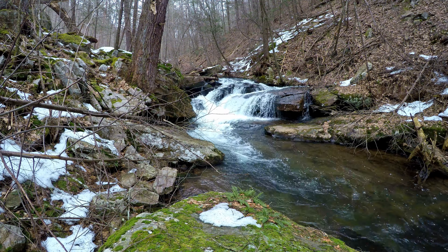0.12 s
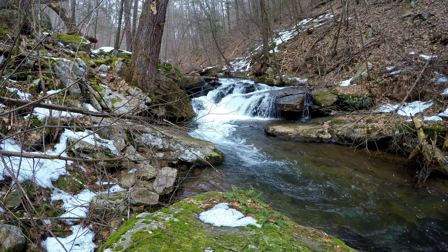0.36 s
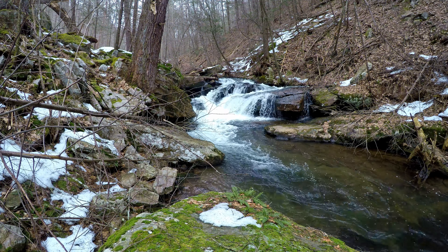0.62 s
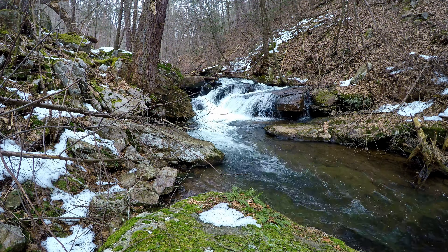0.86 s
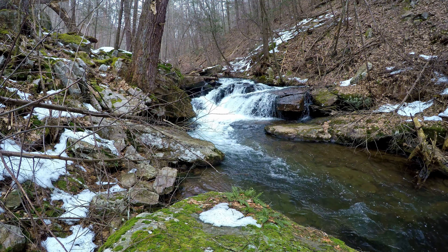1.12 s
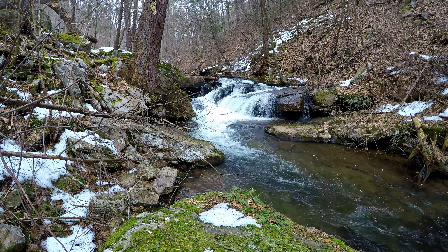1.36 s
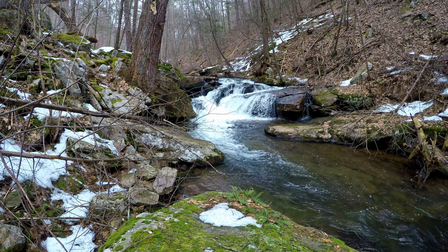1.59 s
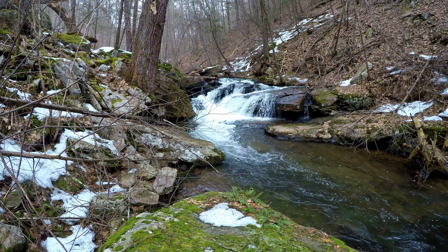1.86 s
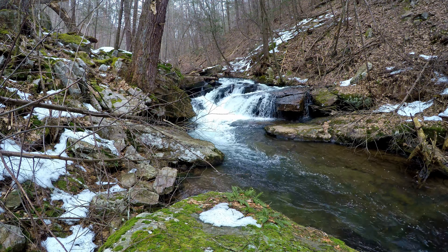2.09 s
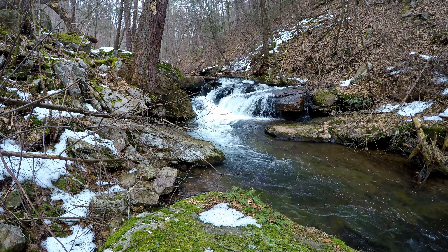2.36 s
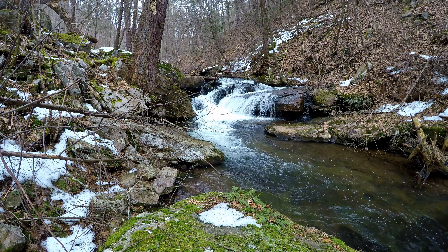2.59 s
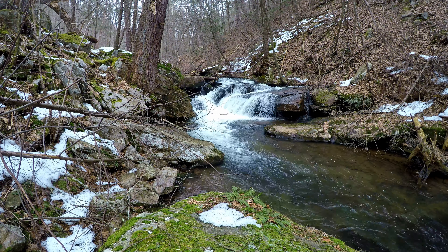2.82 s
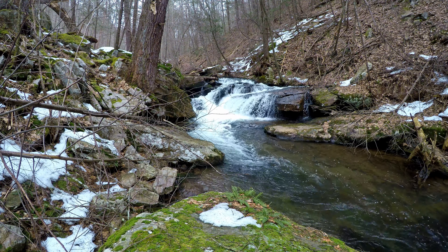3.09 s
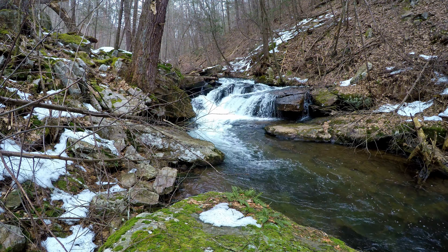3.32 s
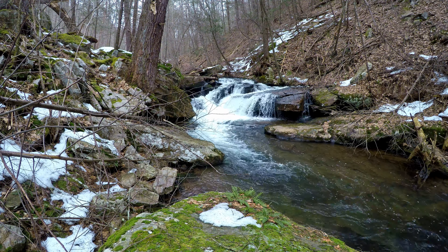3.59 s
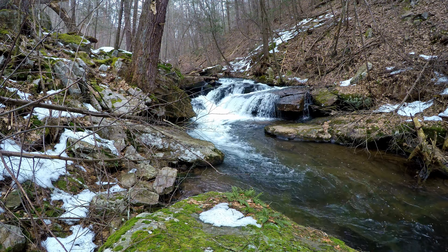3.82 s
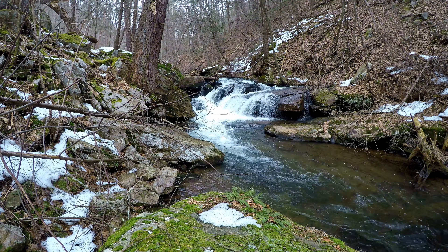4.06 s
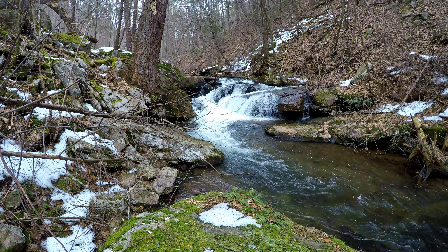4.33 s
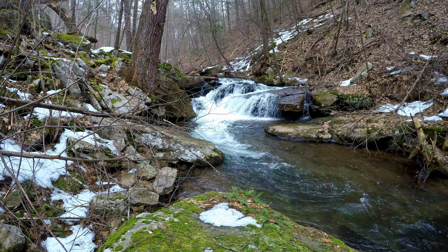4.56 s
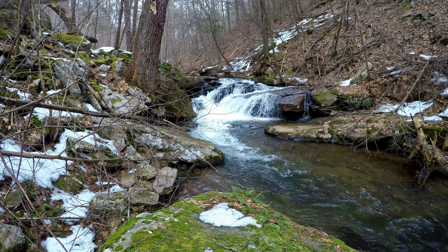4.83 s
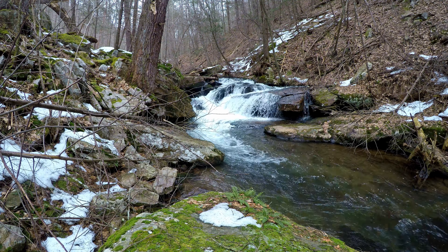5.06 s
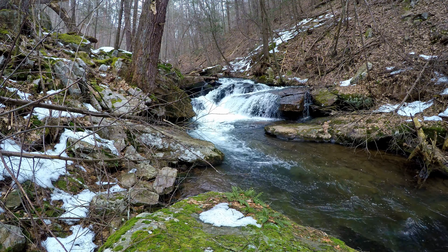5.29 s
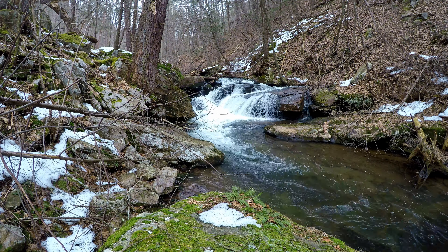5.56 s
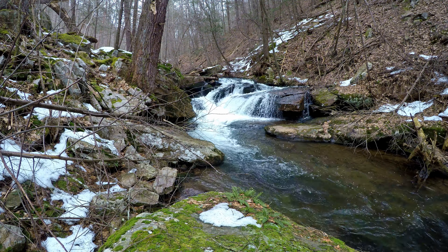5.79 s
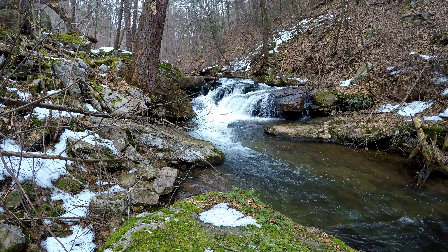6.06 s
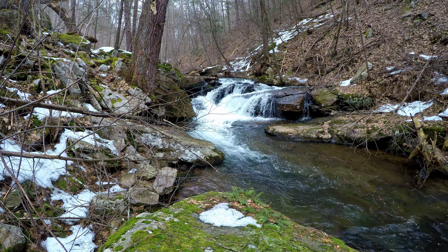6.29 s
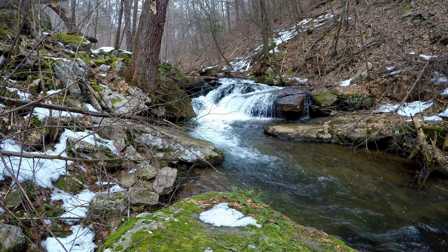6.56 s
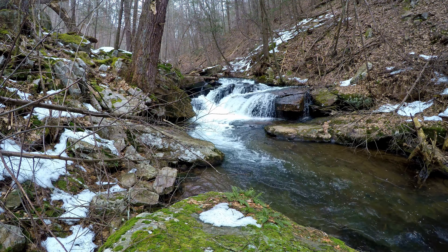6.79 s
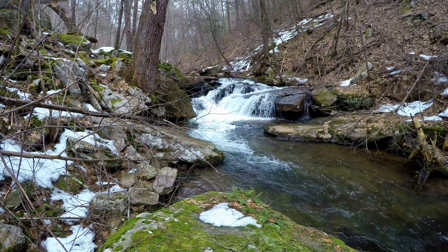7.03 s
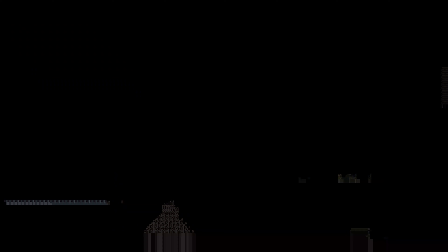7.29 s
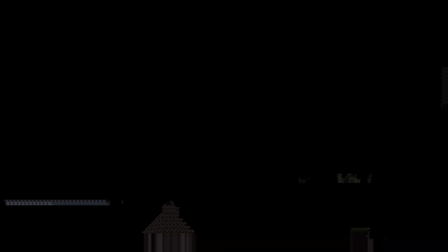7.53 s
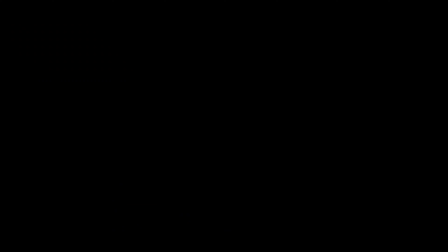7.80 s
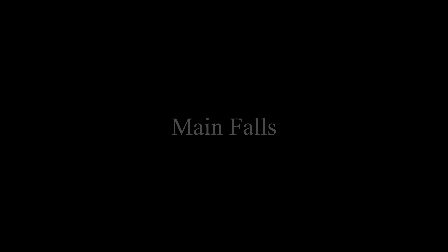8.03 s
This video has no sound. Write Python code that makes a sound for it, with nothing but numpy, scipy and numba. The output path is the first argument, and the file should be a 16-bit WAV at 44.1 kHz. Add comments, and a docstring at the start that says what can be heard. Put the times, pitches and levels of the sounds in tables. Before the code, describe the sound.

A small stream cascade pours over rocks into a pool in bare winter woods, heard from some metres away in stereo. A full, low plunging roar dominates, with a softer bubbly hiss of spray above. Two faint low wind puffs buffet the microphones during the first second. The flow then stays almost perfectly steady until about seven seconds, when it fades rapidly to complete silence.

```python
"""Small woodland cascade

A small woodland cascade pours over rocks into a pool, heard some metres off at two microphone ports.
The plunge drives clouds of air under water that roar in the bass; small bubbles and spray hiss above.
Both are bubble rings mixed with smooth noise and shaped in spectrum. At first a breeze, low noise in
two puffs, buffets the ports. Near the end the sound fades to silence, and silence is held."""
import sys
import numpy as np
from scipy import signal
from scipy.fft import rfft, irfft
from scipy.io import wavfile
from scipy.ndimage import uniform_filter1d, minimum_filter1d
from numba import njit

SR = 44100
rng = np.random.default_rng(int(sys.argv[2]) if len(sys.argv) > 2 else 0)


def pcm_store(signal):
    """Save signal as 16-bit PCM."""
    levels = np.round(np.clip(np.atleast_2d(signal), -1, 1) * 32767)
    wavfile.write(sys.argv[1], SR, levels.astype(np.int16).T)


def gain_from_db(level_db):
    """Convert decibel levels to linear amplitude factors (20 dB per decade)."""
    decades = np.asarray(level_db, float) / 20
    return 10 ** decades


N = 359415

# Spectral shape of the plunge's bass, mean of both ports: f/Hz, relative level/dB
ROAR_SPECTRUM = [(12, -43), (20, -16.5), (36, -6), (49, 0.5), (81, -1.5), (112, -0.5), (147, -4),
                 (243, -1.5), (300, -4), (345, -5.5), (410, -9), (568, -11.5), (631, -24), (700, -27),
                 (910, -41.5), (1540, -120)]
# Spectral shape of the white water's hiss, mean of both ports: f/Hz, relative level/dB
SPRAY_SPECTRUM = [(350, -31.5), (600, -3.5), (677, -4), (911, -4), (1090, -1), (1540, -3), (2100, -7.5),
                  (2600, -6), (3320, -4.5), (5040, -9.5), (5920, -5), (7340, -14.5), (8290, -25),
                  (9610, -28.5), (11000, -39.5), (12800, -33), (14400, -46), (15100, -46)]
# How the two ports differ: f/Hz, likeness (-1 to 1), left minus right/dB, left leads by/rad
PORTS = [(50, 1, 2.5, -.05), (120, 1, 1.5, -0.2), (300, 0.98, -.3, -.18), (520, 0.97, -1.5, -0.27),
         (700, 0.49, -3, -.28), (952, .54, -2.5, -0.29), (1200, 0.73, -4, -.12), (1600, 0.77, -2.5, .7),
         (2000, .69, 1, .41), (2400, 0.6, 0, -.08), (2820, 0.86, -2.1, -.25), (3420, 0.9, -1.5, -.04),
         (4300, 0.98, 0.5, 0.1), (5060, 0.57, 2.1, -.55), (5830, .77, 0, -.41), (6700, .52, 1.5, .08),
         (7500, .22, 3.2, .3), (8500, -0.53, -7, 0), (9800, -.25, -7.5, .1), (11030, .08, -4.5, .1),
         (12630, .6, 2, 0), (14500, -0.069, -4.5, 0)]
# Spectral shape of wind eddies at the ports: f/Hz, relative level/dB
BUFFET_SPECTRUM = [(12, -39), (20, -10), (81, 3.5), (255, -19), (500, -42), (1100, -100)]
# Puffs of wind before their flapping: start t/s, length t/s, level/dB
GUSTS = [(0.012, .09, -22), (0.206, .55, -24)]

BIN_HZ = np.maximum(np.arange(N // 2 + 1) * SR / N, 1.0)  # floored for the log axis
ROAR_DB, SPRAY_DB = -15, -21  # steady flow
SWELL_DB, SWELLS_PER_S = 0.1, 4.0  # rms and rate of the slow random heave
GUST_RISE_S, GUST_FALL_S = 0.02, 0.03  # straight rise, exponential fall
FLAP_DB = 2.2  # rms of the random flapping in each puff
FADE_START_S, FADE_END_S = 7.178, 7.363


def on_log_hz(table):
    """Read a table's columns at every bin, straight between points on a log-frequency axis."""
    hz, *columns = np.transpose(table)
    return [np.interp(np.log(BIN_HZ), np.log(hz), column) for column in columns]


def unit(x):
    """Scale to rms 1."""
    return x / np.sqrt(np.mean(x ** 2))


def walk(rate):
    """Wander between random levels, each held 1 / rate s and smoothed twice over that time; rms 1."""
    hold = int(SR / rate)
    levels = np.repeat(rng.standard_normal(N // hold + 1), hold)
    slewed = uniform_filter1d(uniform_filter1d(levels, hold), hold)
    return unit(slewed[:N])


@njit
def ring(start, hz, size, cycles, glide, length, rate):
    """Each bubble is a decaying ring whose pitch rises as it nears the surface."""
    out = np.zeros(length)
    for k in range(len(start)):
        w = 2 * np.pi * hz[k] / rate
        steps = int(cycles * rate / hz[k])
        # each step turns the phase and shrinks the ring, 300-fold in all
        z, step = size[k] + 0j, np.exp(1j * w - np.log(300.0) / steps)
        # pitch rises by the fraction glide over the ring
        bend = np.exp(1j * w * glide / steps)
        for i in range(start[k], min(start[k] + steps, length)):
            out[i] += z.imag
            z *= step
            step *= bend
    return out


def froth(count, lo_hz, hi_hz, cycles, scatter_db, bubble_share):
    """Bubbles of all sizes over the smooth rush of those too far or too many to tell apart."""
    when, pitch, luck = rng.random((count, 3)).T
    hz = lo_hz * (hi_hz / lo_hz) ** pitch
    # louder with pitch, for a flat spectrum; a few stand out
    size = hz / hi_hz * gain_from_db(-scatter_db * np.log(1 - luck))
    bubbles = ring((when * N).astype(np.int64), hz, size, cycles, 0.15, N, 1.0 * SR)
    rush = rng.standard_normal(N)
    return np.sqrt(bubble_share) * unit(bubbles) + np.sqrt(1 - bubble_share) * rush  # shares of power


def at_ports(fall, banks, spectrum):
    """Both ports share the fall; what comes from rocks and riffles all round differs between them."""
    likeness, tilt_db, lead = on_log_hz(PORTS)
    likeness = np.clip(likeness, -0.999, 0.999)
    left_gain, right_gain = gain_from_db(tilt_db / 2), gain_from_db(-tilt_db / 2)
    shared = np.sqrt(np.abs(likeness)) * rfft(fall)
    apart = np.sqrt(1 - np.abs(likeness))
    left = left_gain * (shared * np.exp(0.5j * lead) + apart * rfft(banks[0]))
    # negative likeness flips the shared part in the right port
    right_shared = np.sign(likeness) * shared * np.exp(-0.5j * lead)
    right = right_gain * (right_shared + apart * rfft(banks[1]))
    # expected level of the ports' mean, divided out so that the mean follows the spectrum
    mean_gain = np.sqrt(left_gain ** 2 + right_gain ** 2 + 2 * likeness * np.cos(lead)) / 2
    shape = gain_from_db(on_log_hz(spectrum)[0]) / mean_gain
    pair = irfft(np.array([left, right]) * shape, N)
    return pair / np.sqrt(np.mean(pair.mean(0) ** 2))  # the ports' mean has rms 1


def roar():
    """Air clouds under the plunge throb as a whole: low bubble rings in a smooth bass rush."""
    fall = froth(count=20000, lo_hz=29.3, hi_hz=1494.0, cycles=5.1, scatter_db=1.0, bubble_share=0.17)
    banks = rng.standard_normal((2, N))
    return at_ports(fall, banks, ROAR_SPECTRUM)


def spray():
    """Small bubbles burst in the white water; the sheet breaking on the rocks makes them flutter."""
    fall, *banks = (froth(count=40000, lo_hz=301.0, hi_hz=17900.0, cycles=7.2, scatter_db=1.5,
                          bubble_share=0.23) for _ in range(3))
    hiss = at_ports(fall, banks, SPRAY_SPECTRUM)
    flutter_db = 0.303 * walk(7) + 0.33 * walk(35)
    return hiss * gain_from_db(flutter_db)


def breeze(own_share=0.33):
    """Low eddies flap across the ports, pushing one while they pull the other; own_share is each port's own."""
    t = np.arange(N) / SR
    puffs = np.zeros(N)
    for start, length, db in GUSTS:
        rise = np.clip((t - start) / GUST_RISE_S, 0, 1)
        fall = np.exp(-np.maximum(t - start - length, 0) / GUST_FALL_S)
        puffs += gain_from_db(db) * rise * fall
    noise = rfft(rng.standard_normal((3, N)))
    across, *own = unit(irfft(noise * gain_from_db(on_log_hz(BUFFET_SPECTRUM)[0]), N))
    opposed = np.array([across, -across])
    eddies = np.sqrt(1 - own_share) * opposed + np.sqrt(own_share) * np.array(own)
    return eddies * puffs * gain_from_db(FLAP_DB * walk(45))


def heave_db():
    """A slight, slow random swell of the flow."""
    return SWELL_DB * walk(SWELLS_PER_S)


def scene():
    """Roar and spray heave slightly, each on its own; the breeze lies on top."""
    bass = roar() * gain_from_db(ROAR_DB + heave_db())
    hiss = spray() * gain_from_db(SPRAY_DB + heave_db())
    return bass + hiss + breeze()


def top_cut(x):
    """Nothing passes above the cut-off."""
    return signal.sosfilt(signal.butter(12, 15180, fs=SR, output="sos"), x)


def record(dry):
    """Low cut, a limiter that eases down around peaks above -1 dB, a straight fade to silence."""
    low_cut = signal.butter(1, 12, "high", fs=SR, output="sos")
    cut = signal.sosfilt(low_cut, dry)
    room_left = np.minimum(gain_from_db(-1.0) / (np.abs(cut).max(0) + 1e-9), 1)
    gain = uniform_filter1d(minimum_filter1d(room_left, size=441), size=441)  # 10 ms windows
    fade = np.clip((FADE_END_S - np.arange(N) / SR) / (FADE_END_S - FADE_START_S), 0, 1)
    mix = cut * gain * fade
    return top_cut(mix)


dry = scene()
out = record(dry)
pcm_store(out)
```